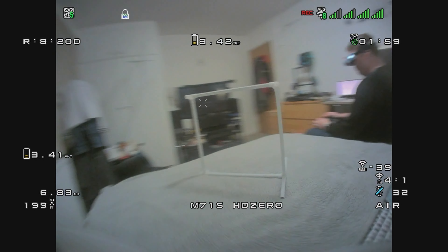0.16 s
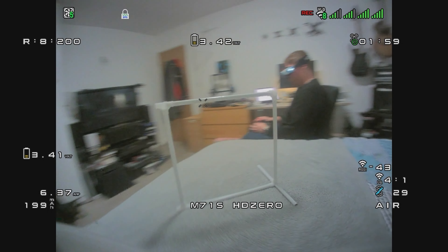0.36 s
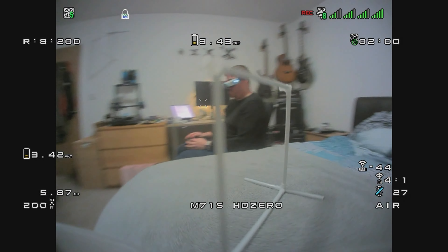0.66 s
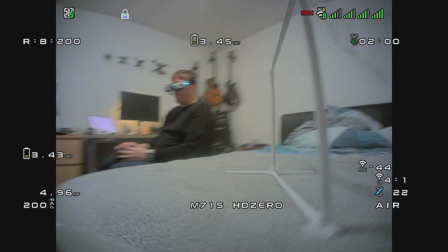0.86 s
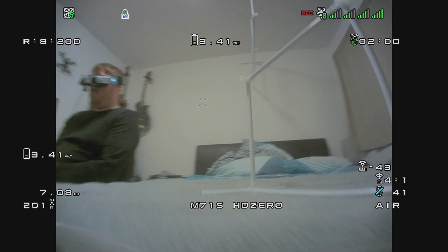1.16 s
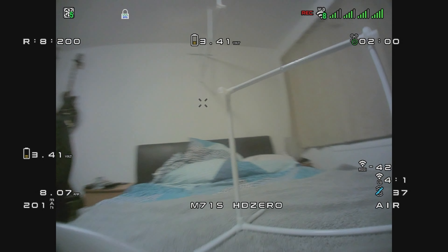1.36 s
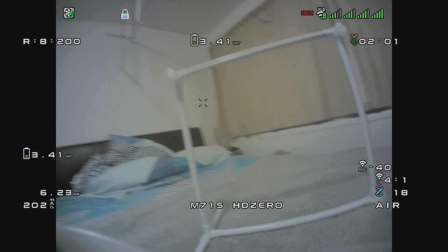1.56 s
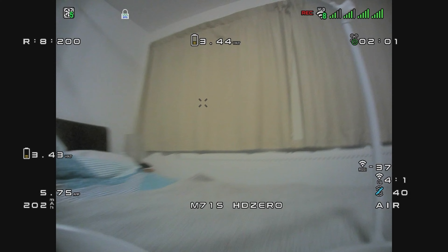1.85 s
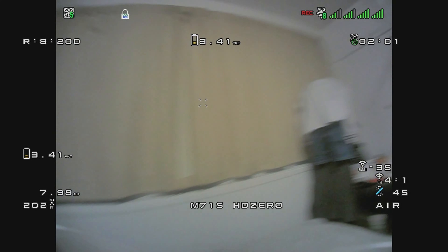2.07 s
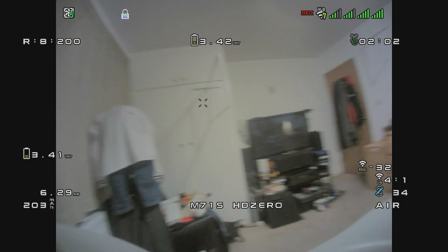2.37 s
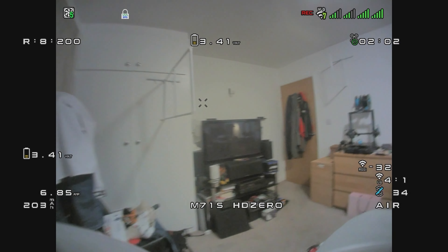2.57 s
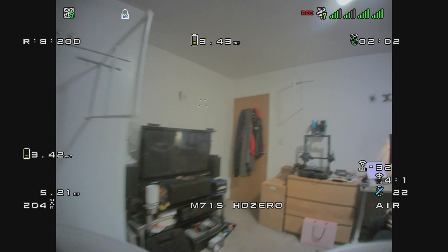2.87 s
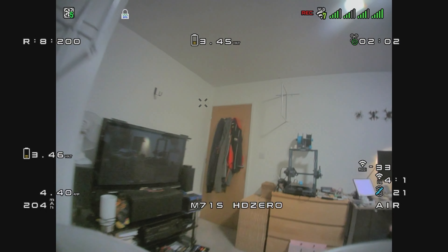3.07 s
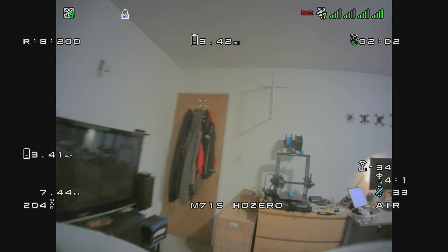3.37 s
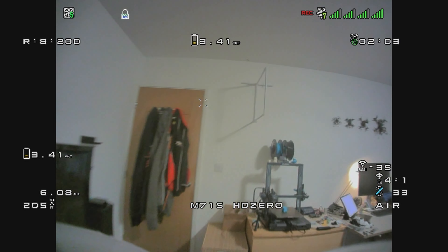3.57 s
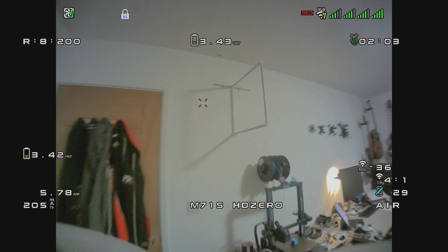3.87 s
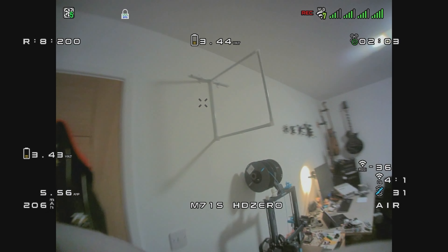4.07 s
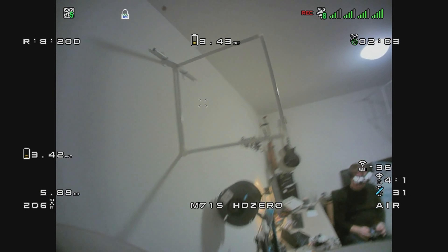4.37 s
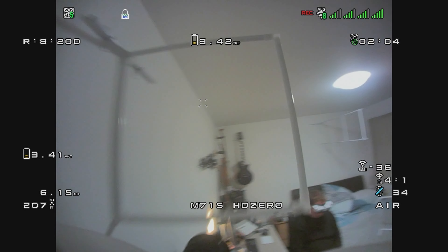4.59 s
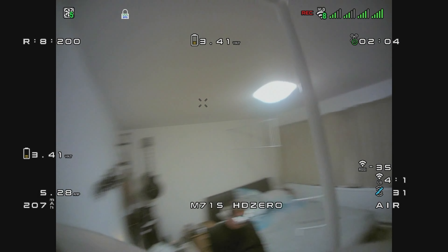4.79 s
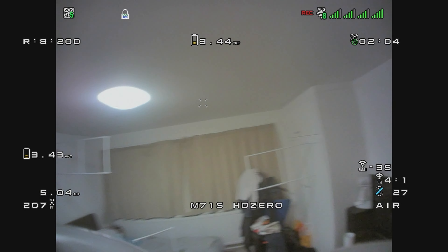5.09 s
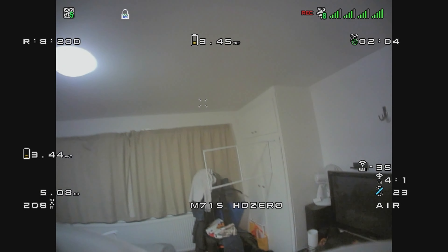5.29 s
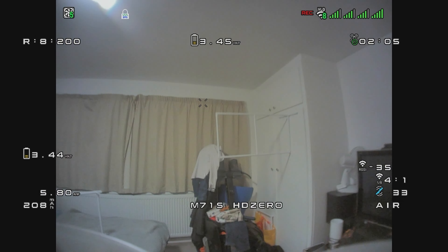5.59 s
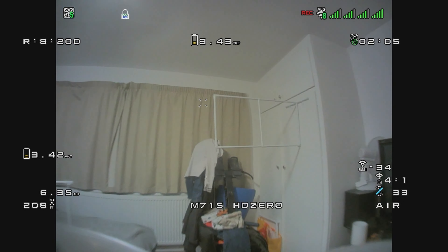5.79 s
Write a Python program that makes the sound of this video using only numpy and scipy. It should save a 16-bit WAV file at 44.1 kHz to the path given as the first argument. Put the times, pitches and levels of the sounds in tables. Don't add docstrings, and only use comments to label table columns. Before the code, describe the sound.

High, nasal propeller buzz rises and dips rapidly indoors with airy hiss, while a small cooling fan hums constantly near the microphone.

```python
import sys
import numpy as np
from scipy import signal
from scipy.fft import rfft, irfft, next_fast_len
from scipy.io import wavfile
from scipy.ndimage import uniform_filter1d

SR = 44100
rng = np.random.default_rng(int(sys.argv[2]) if len(sys.argv) > 2 else 0)


def volts(x):
    e = np.asarray(x, float) / 20
    return 10 ** e


def log_audio(samples):
    frames = np.atleast_2d(samples).T
    limited = np.clip(frames, -1, 1)
    pcm = np.round(limited * 32767).astype(np.int16)
    wavfile.write(sys.argv[1], SR, pcm)


N = 261954
T = np.arange(N) / SR


def walk(rate):
    hold = int(SR / rate)
    steps = np.repeat(rng.standard_normal(N // hold + 1), hold)
    return 1.3 * uniform_filter1d(uniform_filter1d(steps, hold), hold)[:N]


def eased(table):
    s, value = np.transpose(table)
    index = np.arange(len(s))
    place = np.interp(T, s, index)
    part = place % 1
    smooth = part ** 2 * (3 - 2 * part)
    return np.interp(place - part + smooth, index, value)


def bumps(table):
    edge_s = .09
    rows = np.array(table)
    middle, length = rows[:, :1], rows[:, 1:2]
    edge = np.clip(.5 + (length / 2 - np.abs(T - middle)) / edge_s, 0, 1)
    return rows[:, 2:].T @ np.sin(edge * np.pi / 2) ** 2


def air(colour, gain_db):
    size = next_fast_len(N)
    octave = np.log2(np.maximum(np.arange(size // 2 + 1) * SR / size, 1))
    hz, db = np.transpose(colour)
    spectrum = rfft(rng.standard_normal(size)) * volts(np.interp(octave, np.log2(hz), db))
    spectrum = spectrum / np.sqrt(np.mean(irfft(spectrum, size) ** 2))
    centres = np.r_[8:13:.6, 13.1:14:.17]
    total = np.zeros(N)
    for centre, peak in zip(centres, np.eye(len(centres))):
        window = np.interp(octave, centres, peak)
        total += irfft(spectrum * window, size)[:N] * volts(gain_db(2 ** centre))
    return total


# (multiple of shaft rate, level [dB])
FAN_HARMONICS = [(1, -74.5), (2, -61.5), (3, -62.5), (7, -57), (11, -62), (20, -59)]
# (frequency [Hz], level [dB])
SECOND_FAN_TONES = [(977, -86), (1223, -59)]
# (frequency [Hz], density [dB per Hz])
FAN_SPECTRUM = [(25, -40), (50, -50), (120, -39.5), (250, -26), (500, -21), (870, -12), (1100, -14),
                (1400, -12), (1800, -4), (2200, -12.5), (3000, -11), (6000, -15.5), (10000, -22),
                (16000, -32.5)]


def fan():
    shaft_hz, rush_db = 189.5, -38.5
    turn = 2 * np.pi * np.cumsum(shaft_hz * (1 + 0.00121 * walk(2))) / SR
    hum = np.zeros(N)
    for k, db in FAN_HARMONICS:
        hum += volts(db + 1.15 * walk(7.9)) * np.sin(k * turn + k)
    for hz, db in SECOND_FAN_TONES:
        hum += volts(db + 3.2 * walk(6.6)) * np.sin(2 * np.pi * hz * T)
    rush = air(FAN_SPECTRUM, lambda hz: rush_db + .5 * walk(9.9))
    return np.sqrt(2) * hum + rush


def room(x):
    t60_s, tail_db = 0.17, 1.5
    t = np.arange(SR // 2) / SR
    tail = rng.standard_normal(len(t)) * np.exp(-np.log(1000) * t / t60_s) * (t > .004)
    tail = tail / np.sqrt(np.sum(tail ** 2))
    reverberant = signal.fftconvolve(x, tail)[:N]
    return (x + volts(tail_db) * reverberant) / np.sqrt(1 + volts(2 * tail_db))


COGGING = 18
# (multiple of blade rate, level [dB])
UPPER_HARMONICS = [(4, 2), (5, 0), (6, -3), (7, -2)]


def rotor(hz, tone_db, octave_db, upper_db, whine_db):
    hz = hz * (1 + .0015 * walk(25) + .0015 * walk(120))
    turn = 2 * np.pi * np.cumsum(hz) / SR
    shaken = turn + .36 * walk(150)
    levels = [(.5, tone_db - 16.5), (1, tone_db - 1.5), (2, octave_db), (3, upper_db[0])]
    levels += [(k, upper_db[1] + db) for k, db in UPPER_HARMONICS]
    tones = np.zeros(N)
    for k, db in levels:
        tones += volts(db + 3.3 * walk(22)) * np.sin(k * shaken + 2 * np.pi * rng.random())
    whine_hz = COGGING * hz
    frame_db = np.interp(whine_hz, [11500, 13500], [3.5, -1])
    audible = np.clip((20000 - whine_hz) / 500, 0, 1)
    whine_level = audible * volts(whine_db + frame_db + 2.5 * walk(30))
    whine = whine_level * np.sin(COGGING * turn + .6 * walk(200))
    return np.sqrt(2) * (tones + whine), turn


# (time [s], blade rate [Hz])
THROTTLE_CURVE = [(.25, 935), (.76, 795), (.99, 1030), (1.09, 1015), (1.23, 1140), (1.55, 620),
                  (1.91, 1145), (2.15, 865), (2.56, 955), (2.8, 690), (2.96, 670), (3.17, 1120), (3.6, 805),
                  (4.3, 865), (4.52, 1015), (4.82, 715), (5.31, 715), (5.53, 978)]
ROTOR_TRIM = [0, -45, -30]
# (middle [s], length [s], all rotors [Hz], second rotor [Hz], third rotor [Hz])
STICK_NUDGES = [(.1, .25, 0, -90, -15), (.5, .2, -40, 0, 0), (.57, .56, 0, 0, -130), (1.0, .1, 0, -85, -40),
                (1.29, .18, 0, -20, -85), (1.62, .08, 0, -30, 0), (1.7, .12, -50, 0, 0),
                (1.91, .17, 0, -45, -140), (2.32, .2, 25, -50, -20), (2.59, .1, 0, -90, -125),
                (2.88, .36, 0, -45, 0), (2.95, .24, 0, 0, -105), (3.27, .2, -38, 0, -110),
                (3.82, .3, 30, 0, -35), (4.1, .25, 9, 30, -72), (4.45, .42, 0, 10, -85),
                (4.86, .16, 0, 10, -50), (5.12, .2, 88, 0, -20), (5.33, .16, 0, 0, 45),
                (5.45, .58, 0, -85, 0), (5.43, .12, 0, -75, 0), (5.6, 1.06, 0, -70, 0),
                (5.8, .46, 0, 0, -44), (5.96, .28, 105, -65, -20)]
# (time [s], level [dB])
LOAD_CURVE = [(0, 2), (.78, -0.5), (.99, 6), (1.28, 4), (1.56, -6.5), (1.87, 6), (2.13, -3.5), (2.48, -1),
              (2.78, -6), (3.02, -4.5), (3.19, 6), (3.56, -3), (3.76, -.5), (4.52, 1.5), (4.82, -4),
              (5.1, 2.5), (5.32, -0.5), (5.52, 6.5)]
# (middle [s], length [s], third [dB], fourth and up [dB], low hiss [dB])
INFLOW = [(.52, 0.33, 2, 5, 0), (.93, 0.19, 8, 4, 3), (1.05, .14, 2, 9, 2), (1.25, .22, 5, 4, 3),
          (1.88, .2, 1, -2, -1), (2.8, .2, 4, 0, -2), (3.25, 0.2, -1, 1.5, -1), (4.25, .25, -2, -3, -2),
          (4.52, .15, 6, 0, -3), (4.85, 0.14, -2, -1, -2), (5.12, 0.16, -1, 6.5, 0), (5.3, .1, -3, 5, 0),
          (5.53, 0.13, 5, 5.5, -1.5), (5.7, .2, 3.5, 0, -2), (5.9, .15, -2, -13, -0.5)]
# (middle [s], length [s], blade tone [dB], octave [dB])
ROTOR_FACING = [
    [(1.17, .12, 2, 13.5), (1.25, .12, 1, 0), (1.85, 0.28, 4.5, -3), (3.18, 0.078, 5, 1),
     (2.55, 0.13, 3, 0), (3.42, .15, 0, 5), (3.7, 0.14, -5, 9), (4.1, .26, 10, 4), (4.3, .08, 6, 4),
     (4.44, .1, 6, 6), (4.55, .2, 0.5, 3.5), (5.12, .2, 3, 4), (5.3, .12, 7, 7), (5.65, 0.34, 3, 7)],
    [(.75, .2, -4, 6), (1.72, 0.23, 9.5, 0), (1.92, .14, 6, 11), (3.18, .12, 6, 15), (4.3, .5, 1, 5),
     (5.1, .2, 3, 0), (5.7, 0.18, 3.5, 0), (5.53, 0.09, 0, 20), (5.88, 0.23, 4, 14)],
    [(0, 0.18, 4.5, 0), (.75, 0.17, 9, 8), (1.25, .15, 5, 9), (1.9, .15, -5, 0), (3.2, .15, -10, 0),
     (5.55, 0.36, 0.5, 17), (5.88, 0.2, 2.5, 16)],
]
BLADE_TONE = [-56.5, -58.5, -60.5]
BLADE_OCTAVE = [-58.5, -60.5, -62.5]
# (frequency [Hz], level [dB])
WHINE_RESPONSE = [(9500, -51), (10700, -48), (11700, -50), (12500, -58), (13700, -49), (14700, -58),
                  (15500, -50.5), (16500, -59)]
WHINE_TRIM = [-1, 0, -7]
# (frequency [Hz], density [dB per Hz])
WASH_SPECTRUM = [(200, -57), (700, -48), (1200, -12), (1900, -13.5), (2400, -8.5), (3700, -5), (5500, -2),
                 (7000, -1.5), (8700, 1.5), (10500, -3.5), (12500, -8), (14200, -7), (15300, -12.5),
                 (16000, -14.5)]


def drone():
    hover_hz, hover_wash_db = 860, -32
    every, second, third = bumps(STICK_NUDGES)
    offsets = np.array([0 * every, second, third]) + np.array(ROTOR_TRIM)[:, None]
    rates = eased(THROTTLE_CURVE) + every + offsets
    speed = np.log2(rates / hover_hz)
    load_db = eased(LOAD_CURVE)
    *choppy_db, rumble_db = bumps(INFLOW)
    wash_db = hover_wash_db + load_db
    low_db, top_db = -0.33 * load_db + rumble_db, -0.35 * load_db
    upper_db = np.array([[-58], [-58]]) + 0.95 * load_db + choppy_db

    rotors = []
    for k in range(3):
        facing_db = bumps(ROTOR_FACING[k]) + 0.24 * load_db
        tone_db = BLADE_TONE[k] + 16 * speed[k] + facing_db[0]
        octave_db = BLADE_OCTAVE[k] + 6.5 * speed[k] + facing_db[1]
        response_db = np.interp(COGGING * rates[k], *np.transpose(WHINE_RESPONSE))
        whine_db = WHINE_TRIM[k] - .4 * load_db + response_db
        rotors.append(rotor(rates[k], tone_db, octave_db, upper_db, whine_db))
    fourth = np.mean(rates, axis=0) * (1 + 0.023 * walk(3))
    rotors.append(rotor(fourth, tone_db - 7.5, octave_db - 7, upper_db - 1, whine_db - 3))
    chop = 1 + 0.057 * sum(np.cos(turn) for _, turn in rotors)
    gust = 0.66 * walk(10)

    def band_db(hz):
        low = np.clip(np.log2(5000 / hz), 0, 1) * (low_db - low_db.mean())
        top = np.clip(2 * np.log2(hz / 9500), 0, 1.3) * (top_db - top_db.mean())
        tips = -45 * np.clip(np.log2(hz / (20.0 * rates[0])), 0, .3)
        return wash_db + 1.5 + low + top + tips + gust + 0.71 * walk(20)

    return sum(tone for tone, _ in rotors), chop * air(WASH_SPECTRUM, band_db)


def scene():
    tones, wash = drone()
    mono = room(tones) + wash + fan()
    return np.array([mono, mono])


SLIP_TIMES = [.229, .275, .323, .554, 1.228, 1.414, 1.621, 2.367, 3.108, 3.364, 3.504, 3.55, 4.061, 4.177,
              4.781, 4.845, 5.269, 5.362, 5.477, 5.895, 5.929]
SLIP_BORDERS = [4200, 5400, 6900, 8250, 9800, 10900, 12400, 13800, 15680]


def slips(x):
    size, bands = 2048, 2
    side = np.zeros(N)
    band = np.searchsorted(SLIP_BORDERS, np.arange(size // 2 + 1) * SR / size)
    later = np.concatenate([x[600:], x[-600:], x[-size:]])
    order = rng.random((len(SLIP_TIMES), len(SLIP_BORDERS) - 1)).argsort(axis=1)
    picks = 1 + order[:, :bands]
    fade = signal.windows.hann(size) ** .7
    for s, pick in zip(SLIP_TIMES, picks):
        i = int(s * SR) - size // 2
        piece = irfft(rfft(later[i:i + size]) * np.isin(band, pick), size)
        side[i:i + size] += (volts(-3.0) * piece * fade)[:N - i]
    return side


def roll_off(x):
    return signal.sosfilt(signal.butter(12, 16990, fs=SR, output="sos"), x)


def record(dry):
    x = signal.sosfilt(signal.butter(2, 100, "high", fs=SR, output="sos"), dry[0])
    x = signal.sosfilt(signal.ellip(12, .3, 80, 15710, fs=SR, output="sos"), x)
    side = slips(x)
    return roll_off(np.array([x + side, x - side]))


dry = scene()
out = record(dry)
log_audio(out)
```